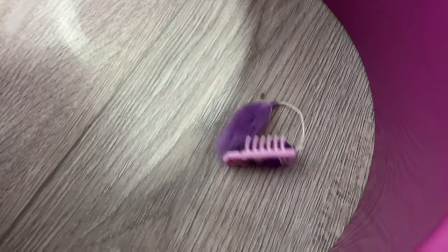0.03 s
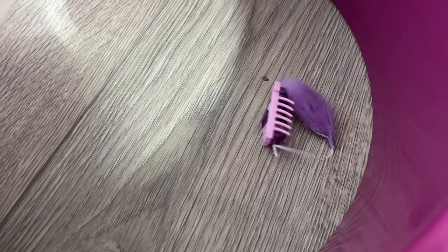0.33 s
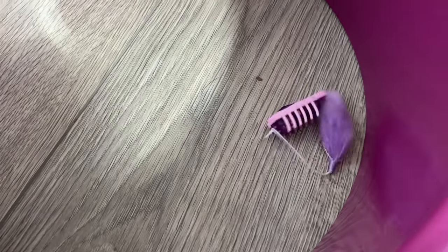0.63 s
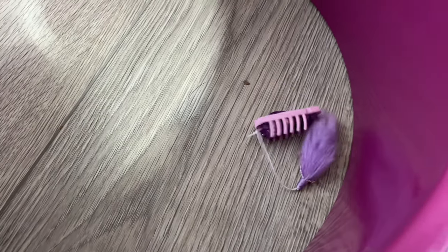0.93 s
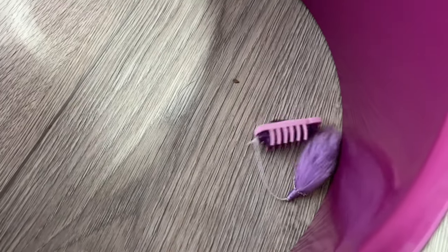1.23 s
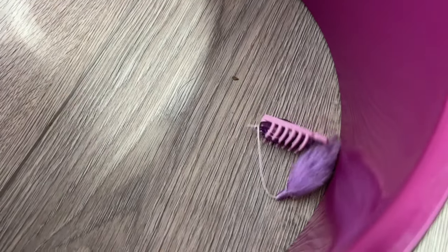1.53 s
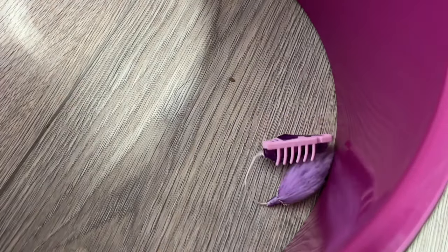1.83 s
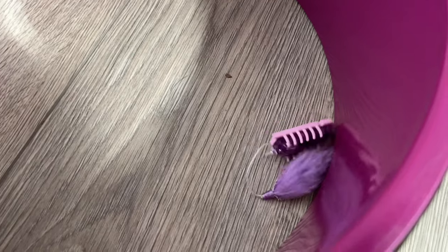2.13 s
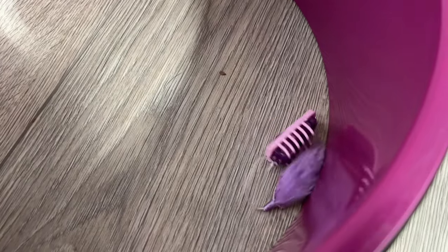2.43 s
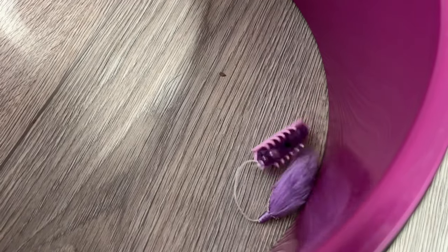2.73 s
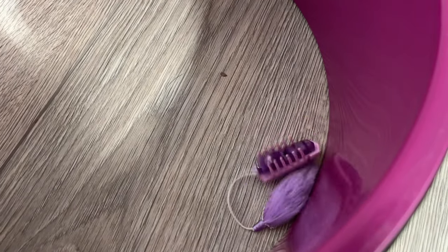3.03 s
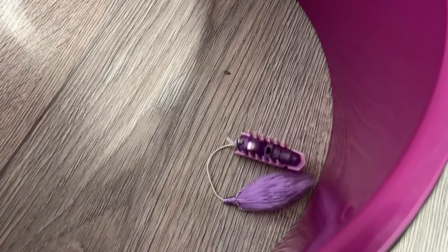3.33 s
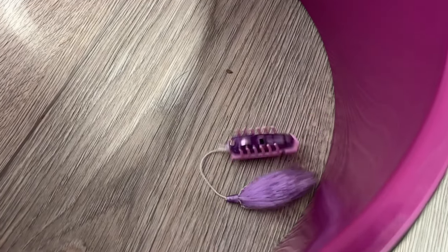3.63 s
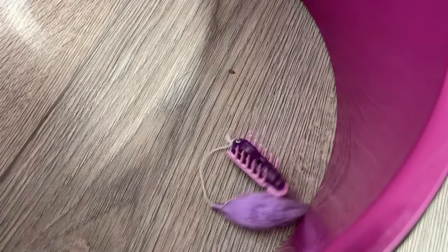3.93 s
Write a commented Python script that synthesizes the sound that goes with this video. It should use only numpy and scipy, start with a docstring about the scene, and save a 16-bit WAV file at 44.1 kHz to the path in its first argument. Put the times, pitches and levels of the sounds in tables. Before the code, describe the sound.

A small battery toy buzzes and rattles on a hard floor against a plastic tub.

```python
"""On a hard floor inside a plastic tub wall, a small battery toy skitters, shaken by an off-centre weight.
It hops and lands with hollow knocks, which turn harder and quicker once it tips over against the wall.
Each landing rings its body and snaps its plastic shell; its legs patter softly in between.
The motor hums and ticks once a turn with a fine hiss, over a low rumble of floor and room.
A small room answers, and two microphone ports hear it all from close by."""
import sys
import numpy as np
from scipy import signal
from scipy.fft import rfft, irfft
from scipy.io import wavfile

SR = 44100
rng = np.random.default_rng(int(sys.argv[2]) if len(sys.argv) > 2 else 0)


def materialize(psi):
    """Save the field psi as 16-bit PCM at rate SR to the path in sys.argv[1].

    A 1-D psi becomes a single channel; in a 2-D psi each row is a channel.
    """
    bounded = np.clip(np.atleast_2d(psi).T, -1, 1)
    quanta = np.round(bounded * 32767).astype(np.int16)
    wavfile.write(sys.argv[1], SR, quanta)


N = 176400
T = np.arange(N) / SR

# The toy's landings. Each row: start in seconds, strength in dB, hardness as the blow's cutoff in Hz.
LANDINGS = [(0.004, -16, 880), (0.0415, -9.5, 1290), (0.096, -6.5, 1700), (0.1493, -7, 1350),
            (0.2091, -18.5, 1070), (0.2184, -15.5, 920), (0.2592, -16, 1210), (0.2849, -11, 1380),
            (0.341, -17.5, 680), (0.3894, -8, 1200), (0.4441, -19.5, 645), (0.5054, -8, 1070),
            (0.5592, -12.5, 1270), (0.621, -13.5, 1680), (0.6842, -9.5, 1020), (0.749, -14, 1830),
            (0.8063, -11, 1300), (0.862, -10, 1140), (0.939, -9, 1410), (0.9879, -11.5, 1340),
            (1.0288, -14, 1570), (1.0872, -11, 1930), (1.1529, -9.5, 1540), (1.2224, -17, 800),
            (1.2832, -14, 1090), (1.3418, -18.5, 540), (1.3948, -9, 1720), (1.455, -17.5, 1000),
            (1.4937, -17.5, 1170), (1.5423, -19, 1230), (1.5967, -20, 1500), (1.6494, -9.5, 1820),
            (1.694, -14, 935), (1.799, -12.5, 1140), (1.883, -11.5, 2160), (1.9224, -13, 786),
            (2.0071, -14, 905), (2.0253, -16, 680), (2.0604, -14, 630), (2.1037, -13, 510),
            (2.156, -18, 1370), (2.207, -17, 1320), (2.241, -14.5, 1050), (2.2813, -20, 1470),
            (2.344, -16.5, 1317), (2.3665, -17.5, 1030), (2.4156, -13.5, 764), (2.4671, -15.5, 835.7),
            (2.591, -13, 1010), (2.614, -12.5, 610), (2.6362, -16.5, 710), (2.681, -12.5, 3300),
            (2.7193, -7.5, 1940), (2.797, -16, 3006), (2.8273, -15.5, 3240), (2.849, -23, 3146),
            (2.9135, -15.5, 2470), (2.9277, -15.5, 2460), (2.9491, -19, 2370), (2.9956, -7.5, 3260),
            (3.073, -14, 5400), (3.1126, -10.5, 2600), (3.1366, -18, 2120), (3.1571, -15, 2570),
            (3.1852, -16, 1910), (3.2168, -15, 2076), (3.2336, -13.5, 2080), (3.2584, -13.5, 2620),
            (3.278, -13.5, 5170), (3.335, -9, 2565), (3.3662, -12, 5010), (3.419, -7.5, 2800),
            (3.441, -12.5, 2764), (3.4574, -19.5, 2330), (3.4787, -12, 870), (3.5296, -9.5, 4934),
            (3.5626, -7.5, 2510), (3.5898, -8.5, 2590), (3.6662, -11, 1059), (3.671, -7.5, 3770),
            (3.7505, -3, 2900), (3.8254, -17.5, 2570), (3.8382, -16.5, 1760), (3.8821, -12.5, 1500),
            (3.904, -11, 907), (3.9475, -5, 1048)]


def amp(db):
    """Decibels to gain."""
    return 10 ** (np.asarray(db) / 20)


def unit(x):
    """Scales to rms 1."""
    return x / np.sqrt(np.mean(x ** 2) + 1e-20)


def curve_at(points, hz):
    """Reads a curve along a log-frequency axis."""
    point_hz, value = np.transpose(points)
    return np.interp(np.log(hz + 1), np.log(point_hz + 1), value)


def add(mix, start_s, sound):
    """Mixes a sound in at its start time."""
    part = mix[max(round(start_s * SR), 0):][:len(sound)]
    part += sound[:len(part)]


def colour(x, eq, size=8192):
    """Minimum-phase EQ: nothing rings ahead of an attack."""
    db = curve_at(eq, abs(np.fft.fftfreq(size, 1 / SR)))
    log_response = np.conj(signal.hilbert(np.log(amp(db))))
    kernel = np.fft.ifft(np.exp(log_response)).real
    return signal.fftconvolve(x, kernel[:size // 2])[:N]


def drift(rate_hz):
    """A smooth random wobble, rms 1."""
    hz = np.fft.rfftfreq(N, 1 / SR)
    return unit(irfft(rfft(rng.standard_normal(N)) * np.exp(-(hz / rate_hz) ** 2), N))


def rumble():
    """Low noise of the shaken floor and the room."""
    # Each row: frequency in Hz, gain in dB.
    rumble_eq = [(32, -28), (58, 4), (90, -3), (150, -3), (330, -8.5), (700, -16), (16000, -45)]
    return amp(-48) * unit(colour(rng.standard_normal(N), rumble_eq))


def room(x, predelay_s=0.0072):
    """A diffuse tail for each port, every band dying at its own speed; the bass is shared."""
    # Each row: frequency in Hz, seconds to fall by 60 dB.
    decay_times = [(400, 0.34), (1000, 0.22), (2500, 0.96), (16000, 0.24)]
    hz, t, noise = signal.stft(rng.standard_normal((2, SR // 2)), SR, nperseg=256)
    shared = np.exp(-hz / 1200)[:, None]
    noise[1] = shared * noise[0] + np.sqrt(1 - shared ** 2) * noise[1]
    decay = amp(-60 * t / curve_at(decay_times, hz)[:, None])
    tail = signal.istft(noise * decay, SR, nperseg=256)[1]
    tail *= np.clip(T[:tail.shape[1]] / predelay_s - 1, 0, 1)
    return signal.fftconvolve(x[None], tail / np.linalg.norm(tail[0]), axes=1)[:, :N]


def ports(x):
    """The direct sound reaches the two microphone ports with its own level and phase in each band."""
    # Each row: frequency in Hz, left level over right in dB.
    balance = [(60, 2), (170, 0.5), (450, 5.5), (850, 2.5), (1260, 0.5), (1520, 0), (1800, 1), (3400, 2.5),
               (7200, 0)]
    # Each row: frequency in Hz, lead of the left port in radians.
    phase_lead = [(100, 0.24), (450, 1), (1130, 0.57), (1260, 4), (1420, 8), (1750, 5), (2100, 7),
                  (3000, 7), (5000, 6.5), (7000, 1.79), (8400, 0.5), (10000, -0.83), (12500, -3.5),
                  (16000, -4.5)]
    hz = np.fft.rfftfreq(N, 1 / SR)
    left = amp(curve_at(balance, hz))
    right = np.exp(-1j * curve_at(phase_lead, hz))
    equal_power = np.sqrt(2 / (1 + left ** 2))
    return irfft(rfft(x) * np.array([left, right]) * equal_power, N)


def motor(tick_s=0.001, scrape=0.43, jitter=0.03):
    """Each turn of the weight gives one hissy tick of uneven strength, over a light scrape and a hum."""
    # Each row: time in seconds, turns per second, faders of the ticking and of its top fizz in dB.
    automation = [(0.0, 172, -47.5, -47), (0.852, 182, -48, -48), (1.25, 169, -46.5, -52.5),
                  (1.999, 152, -44, -49.5), (2.2, 164, -43.5, -44), (2.599, 164, -45, -47.5),
                  (3.81, 171, -48, -47), (3.889, 128, -44.5, -39), (4.0, 163, -56, -56)]
    # Tone of the ticking. Each row: frequency in Hz, gain in dB.
    tick_eq = [(300, -19), (2800, -10.5), (4400, -11.5), (5900, -14.5), (7050, 3), (8700, 1.5),
               (9800, -5.5), (11200, -5.5), (13000, -17), (16000, -9)]
    # Tone of the fizz on top. Each row: frequency in Hz, gain in dB.
    fizz_eq = [(8000, -45), (11000, -0.5), (12800, -13), (14200, 2.5), (16000, 10)]
    times, speed, tick_db, fizz_db = np.transpose(automation)
    turn_hz = np.interp(T, times, speed) * (1 + jitter * drift(40))
    turns = np.cumsum(turn_hz) / SR
    strength = amp(8.5 * rng.uniform(-1, 1, N))[turns.astype(int)]  # one draw per turn
    ticks = strength * np.exp(-(turns % 1) / turn_hz / tick_s)
    grit = np.hypot(ticks, scrape) * amp(4 * np.tanh(drift(45)))  # flutters by up to 4 dB
    ticking = unit(colour(grit * rng.standard_normal(N), tick_eq))
    ticking *= amp(np.interp(T, times, tick_db) + 3)
    fizz = unit(colour(np.sqrt(grit) * rng.standard_normal(N), fizz_eq))
    fizz *= amp(np.interp(T, times, fizz_db) + 10)
    hum = np.sin(2 * np.pi * turns) * amp(2 * drift(18))
    return ticking + fizz + amp(-53) * unit(hum)


def soften(x, cutoff_hz):
    """A longer contact takes the treble out of a blow."""
    return signal.sosfilt(signal.butter(3, cutoff_hz, fs=SR, output="sos"), x)


def leg_patter(taps_per_s=73):
    """The force of the legs tapping softly at random moments."""
    taps = rng.random(N) < taps_per_s / SR
    tap_db = -33.5 + 5 * np.clip(rng.standard_normal(N), -2, 2)
    return soften(taps * amp(tap_db) + 1e-12, cutoff_hz=470)


def shell_snaps(decay_s=0.00091, db_per_db=1.71):
    """The plastic shell cracks briefly at each landing, standing out more in strong blows."""
    snaps, t = np.zeros(N), T[:SR // 50]
    for start_s, strength_db, _ in LANDINGS:
        crack = rng.standard_normal(len(t)) * np.exp(-t / decay_s)
        add(snaps, start_s, amp(-16.5 + db_per_db * strength_db) * crack)
    return snaps


def travelling_bass(x, thud_hz=165, knock_hz=440):
    """The bass changes as the toy travels: two low bands swell and dip."""
    # Each row: time in seconds, gain of the thud in dB, gain of the low knock in dB.
    bass_moves = [(0.1, -3.5, 5), (1.1, 2.5, -1.5), (2.4, 6.5, -2), (3.101, -0.5, -3.5)]
    times, thud_db, knock_db = np.transpose(bass_moves)
    for hz, db in [(thud_hz, thud_db), (knock_hz, knock_db)]:
        band = signal.lfilter(*signal.iirpeak(hz, Q=2, fs=SR), x)
        x = x + (amp(np.interp(T, times, db)) - 1) * band
    return x


def spread_attack(x):
    """Some bands arrive a moment late, smearing each knock's attack like a quick echo off the tub wall."""
    # Each row: centre in Hz, width in Hz.
    late_bands = [(470, 400), (1550, 510), (2350, 390)]
    for hz, width in late_bands:
        radius = np.exp(-np.pi * width / SR)
        poles = np.array([1, -2 * radius * np.cos(2 * np.pi * hz / SR), radius ** 2])
        x = signal.lfilter(poles[::-1], poles, x)  # all-pass
    return x


def bending_waves(x, longest_delay_s=0.01585, half_delay_hz=149.5):
    """Bending waves travel slower the lower they are, so each knock falls away into a thud."""
    hz = np.fft.rfftfreq(N * 2, 1 / SR)
    delay_s = longest_delay_s / (1 + (hz / half_delay_hz) ** 3)
    phase = 2 * np.pi * np.cumsum(delay_s) * hz[1]
    return irfft(rfft(x, N * 2) * np.exp(-1j * phase))[:N]


def hollow_knocks(chatter_s=0.018, detune=0.01):
    """Landings and leg taps sound the hollow body; after a landing, loose parts chatter and tones ring."""
    # Resonance of the hollow body. Each row: frequency in Hz, gain in dB.
    body_eq = [(25, -13), (60, 12.5), (110, 15.5), (160, 25), (215, 15.5), (290, 26.5), (430, 26),
               (570, 20.5), (690, 6), (770, 19), (845, 37.5), (950, 31.5), (1130, 27), (1260, 32.5),
               (1400, 26), (1670, 26.5), (1950, 15.5), (2300, 21), (2540, 16), (2850, 19.5), (3200, 6),
               (4000, 15.5), (4500, -5.5), (16000, -4)]
    # Tones that ring on. Each row: pitch in Hz, gain in dB, seconds to fall by 60 dB.
    modes = [(183, -37.5, 0.079), (278.3, -33, 0.16), (820, -54, 0.15), (1357, -38, 0.065),
             (1669, -19, 0.07), (1970, -34.5, 0.11), (2289, -25, 0.1), (2724, -29, 0.098)]
    mode_hz, mode_db, t60 = np.transpose(modes)[:, :, None]
    force, ringing, t = leg_patter(), np.zeros(N), T[:SR // 5]
    for start_s, strength_db, cutoff_hz in LANDINGS:
        chatter = amp(-37) * rng.standard_normal(len(t)) * np.exp(-t / chatter_s)
        blow = amp(strength_db) * soften(signal.unit_impulse(len(t)) + chatter, cutoff_hz)
        pitch_scatter, scatter_db = rng.standard_normal((2, len(modes), 1))  # no two ring quite alike
        envelopes = amp(mode_db + scatter_db - 60 * t / t60)
        tones = envelopes * np.cos(2 * np.pi * mode_hz * (1 + detune * pitch_scatter) * t)
        add(force, start_s, blow)
        add(ringing, start_s, signal.fftconvolve(blow, tones.sum(0))[:len(t)])
    body = travelling_bass(colour(force, body_eq) + ringing)
    return bending_waves(spread_attack(body))


def scene():
    """Knocks, motor and rumble up close, with knocks and motor sent to the room."""
    knocks = hollow_knocks() + shell_snaps()
    buzz = motor()
    direct = ports(knocks + buzz + rumble())
    return direct + room(amp(-16) * knocks + amp(-10.5) * buzz)


def record(dry):
    """A steep low-pass trims the very top of the treble."""
    lowpass = signal.firwin(511, cutoff=15850, window=("kaiser", 9), fs=SR)
    return signal.oaconvolve(dry, lowpass[None], "same")


dry = scene()
out = record(dry)
materialize(out)
```